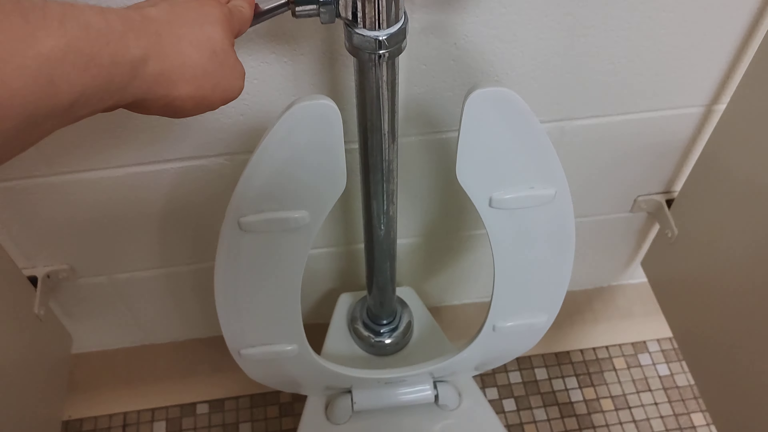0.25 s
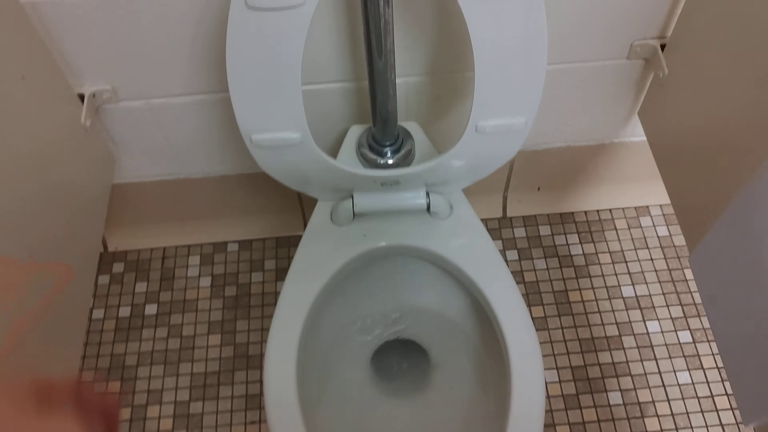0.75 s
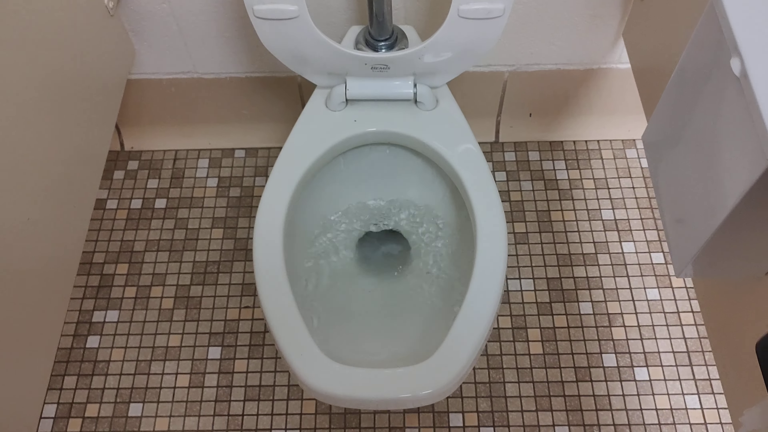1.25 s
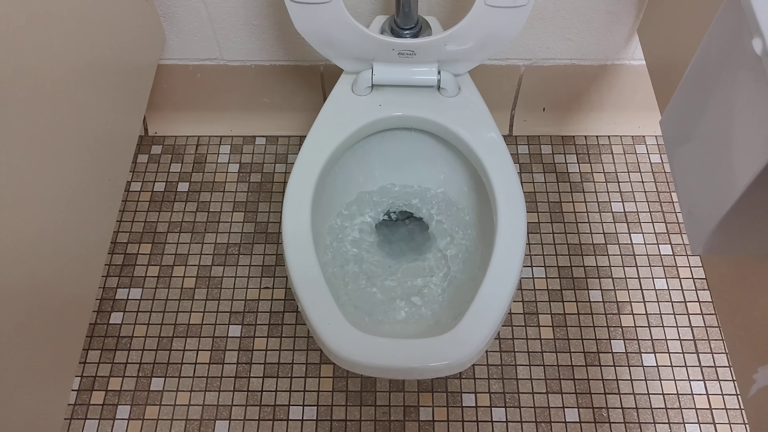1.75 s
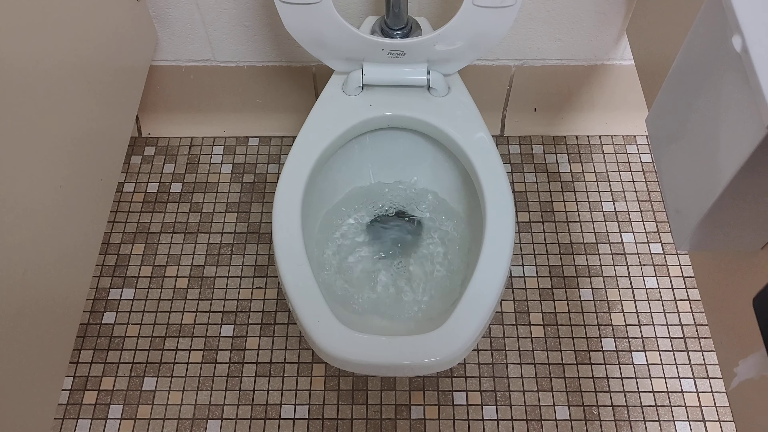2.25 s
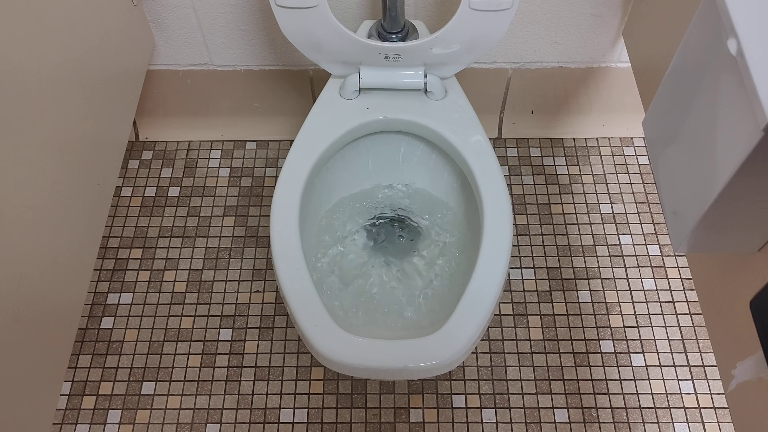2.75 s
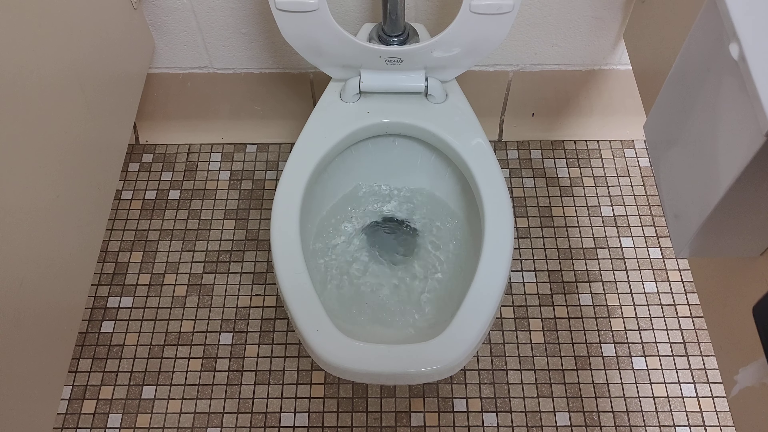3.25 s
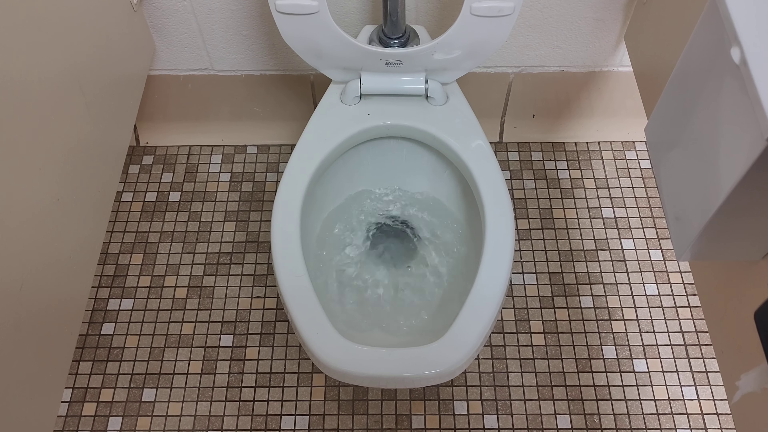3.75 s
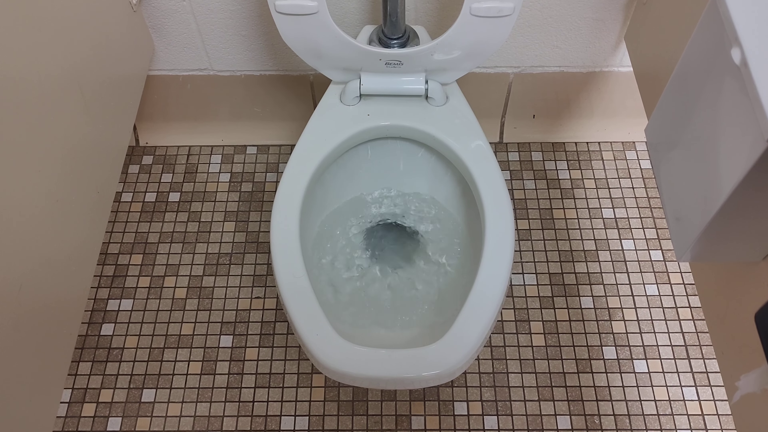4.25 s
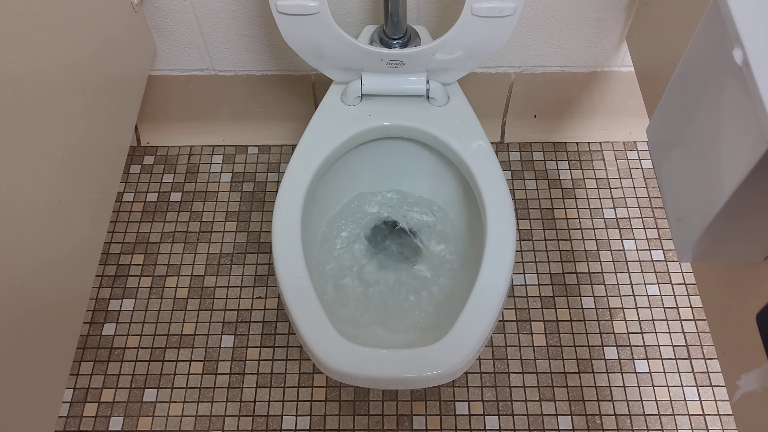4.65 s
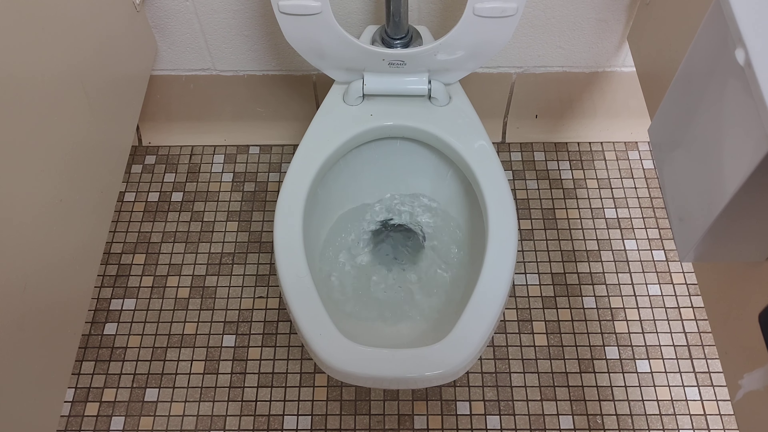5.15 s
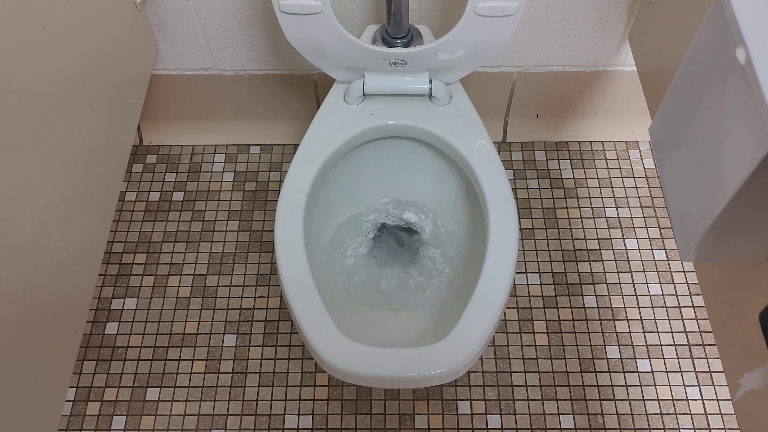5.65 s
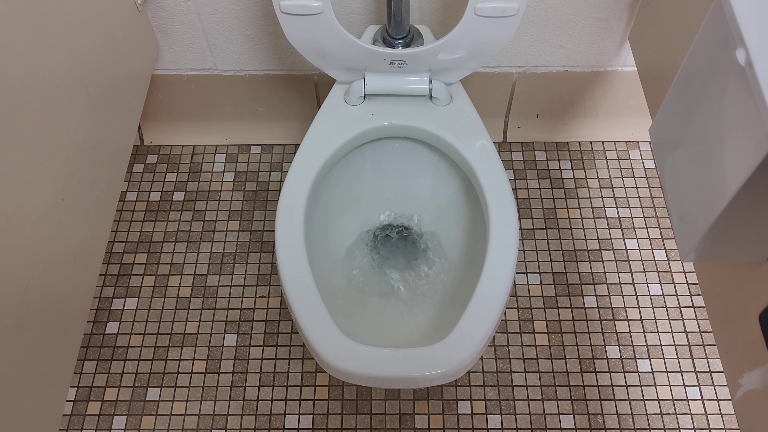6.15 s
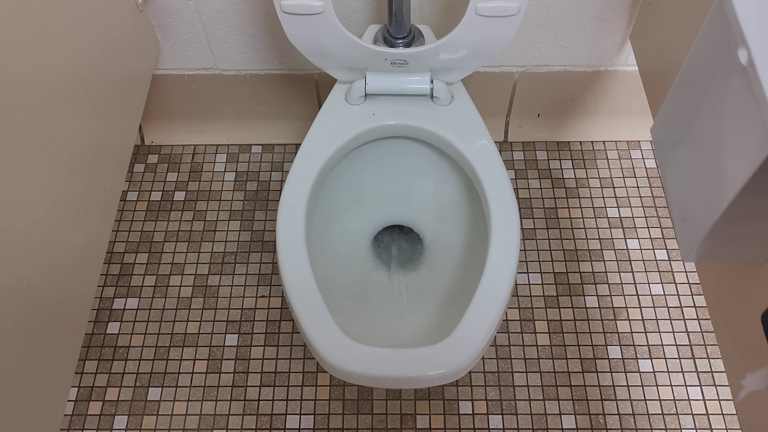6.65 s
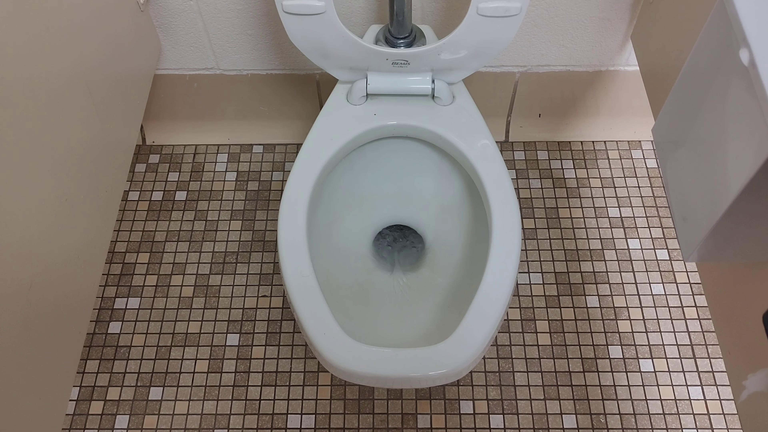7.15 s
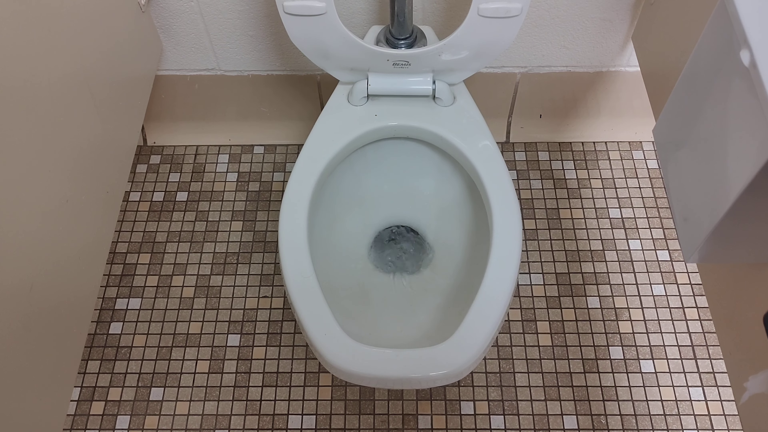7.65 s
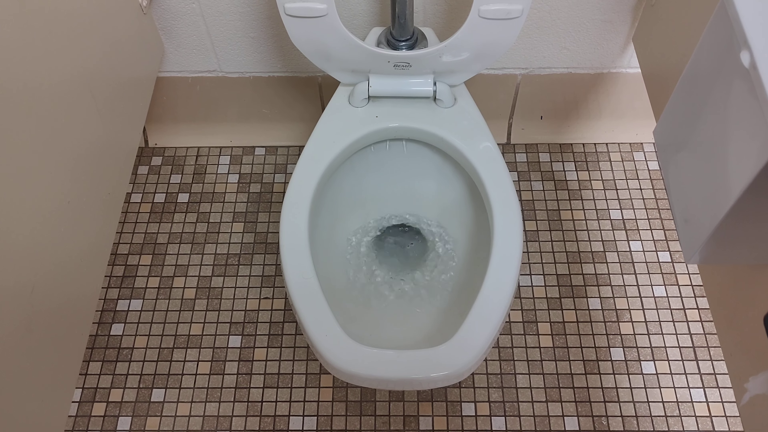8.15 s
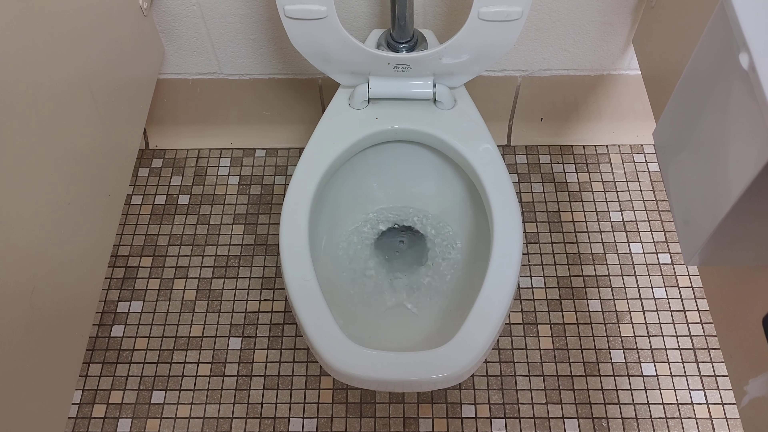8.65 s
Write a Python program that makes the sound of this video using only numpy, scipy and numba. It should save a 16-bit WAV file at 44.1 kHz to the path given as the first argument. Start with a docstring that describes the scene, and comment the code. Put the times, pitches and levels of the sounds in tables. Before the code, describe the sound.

In a small tiled restroom stall, a lever clicks twice and a pressure-valve toilet bursts into a spluttering, booming flush. It settles into a loud, steady, hissing rush of spray over a piped roar. The hiss sharpens as the valve closes with a short squeal, then the trap gulps and gurgles, drips fall, and the drain rumbles low. Close handheld stereo phone, about a metre away, faint ventilation.

```python
"""In a tiled public stall, a pressure-valve toilet flushes about a metre from a hand-held phone.
The handle clicks as two cracks of noise; air and water roar in the pipe as noise shaped by resonances.
Jets spray and splash round the bowl as slapping noise with fizzing bubbles; the closing valve squeals.
The trap gulps and drips fall as bursts of spray with ringing bubbles, while the drain rumbles away as
a wavering low hum. Ventilation noise runs throughout."""
import sys
import numpy as np
from scipy import signal
from scipy.fft import rfft, irfft, next_fast_len
from scipy.io import wavfile
from scipy.ndimage import uniform_filter1d, map_coordinates
from numba import njit

SR = 44100
rng = np.random.default_rng(int(sys.argv[2]) if len(sys.argv) > 2 else 0)


def to_wav(sig):
    """Store sig (one row per channel, or 1-D mono) as 16-bit WAV at the path in sys.argv[1].

    Samples outside -1..1 are clipped; the rate is SR.
    """
    pcm = np.clip(np.atleast_2d(sig), -1, 1) * 32767
    pcm = np.round(pcm).astype(np.int16)
    wavfile.write(sys.argv[1], SR, pcm.T)  # frames by channels


N = 392049
SIZE = next_fast_len(N + SR)
HZ = np.arange(SIZE // 2 + 1) * SR / SIZE + 1e-3  # frequency axis [Hz]
TIME = np.arange(N) / SR  # [s]

# Ventilation: (frequency [Hz], relative spectral density [dB per Hz])
VENTILATION = [(30, -31), (75, -6), (170, -2), (374, -18), (1430, -41), (8080, -36.5), (16000, -42.5)]
VENTILATION_DB = -56
# Handle cracks: (peak time [s], level before colouring [dB], time to fade 60 dB [s])
HANDLE_CRACKS = [(0.259, -38.5, 0.066), (0.305, -24, 0.19)]
# Supply pipe's faint singing: (time [s], level [dB])
PIPE_RING_LEVEL = [(.27, -71.5), (.32, -35), (.4, -41.5), (.46, -28.5), (.54, -28.5)]

# Water through the rim jets, a first spit, a spluttering start, full flow: (time [s], level [dB])
FLOW_LEVEL = [(.31, -22), (.39, -45.5), (.47, -28.5), (.62, -24), (.8, -25.5), (.96, -20.5), (1.1, -24),
              (1.3, -21.5), (1.52, -25), (2.7, -23), (5.9, -25), (6.7, -28.5), (7.25, -29)]
WATER_ARRIVES_S, PIPE_FILLED_S, DRAINING_S, BOWL_EMPTY_S = 0.424, 1.72, 5.12, 5.6
TRAP_OPENS_S, TRAP_RISE_DB_S = 6.79, 156.5
# At the end a fast fall, then a dwindling trickle
FLOW_ENDS_S, ENDING_DB_S, TRICKLE_DB, TRICKLE_DB_S = 7.343, 61.5, -16.5, 18.5

# Air jet at the rim holes: (frequency [Hz], width [Hz], level [dB]), before the sharpening in roar()
AIR_JET_MODES = [(10440, 7400, 0)]
AIR_JET_DB, AIR_GONE_S, AIR_FALL_DB_S = -15.5, 0.57, 30  # level relative to the flow

# Roar of the water-filled pipe: (time [s], level [dB])
PIPE_LEVEL = [(.31, -32.5), (1.15, -28.5), (1.52, -35), (1.8, -29), (2.7, -29), (5.9, -33.5), (6.74, -38.5)]
# Air resonances, lower and upper, of the full pipe and of the pipe still holding air:
# (frequency [Hz], width [Hz], level [dB]), before the sharpening in roar()
FULL_LOW_MODES = [(206, 82, -9.5), (306, 24, -5.5), (348.4, 39, 0)]
FULL_UPPER_MODES = [(499, 75, 0), (617.6, 51, 4), (764, 29, -7), (1012.5, 55, 0.5), (1348, 45, -2.5)]
AIRY_LOW_MODES = [(240.6, 6.4, -5.5), (313.4, 53, -4)]
AIRY_UPPER_MODES = [(613, 67, 2.5), (755, 97, 2), (999, 150, -3), (1334, 15, -4.5)]
UPPER_DB, UPPER_EMPTY_DB = -2, -13.5  # upper roar relative to the lower, after and before water arrives
TRAP_LOW_DB, TRAP_UPPER_DB = -29, -33  # roar of the open trap
# Air pockets bursting from the pipe, later through the trap:
# (time [s], low boom level [dB], upper boom level [dB])
BELCH_EVENTS = [(0.566, -6.5, -22.5), (0.609, -13, -22), (.665, -17.5, -17.5), (0.714, -19, -19),
                (0.776, -11, -17), (.84, -19, -17), (.9, -17.5, -16.5), (1.005, -25.5, -15.5),
                (1.05, -24, -18.5), (1.092, -21.5, -21), (1.165, -36, -24), (1.28, -46.5, -22.5),
                (1.36, -38, -17.5), (1.41, -43, -30), (6.81, -33, -51.5), (7.13, -21, -50.5),
                (7.22, -18, -42.5), (7.6, -33.5, -57.5), (8.075, -42.5, -58)]
BELCH_RISE_DB_S, BELCH_FALL_DB_S = 898.5, 166.5
# Steady roar of air under the bursts
GUSH_LOW_DB, GUSH_UPPER_DB, GUSH_S, GUSH_ENDS_S = -20.5, -26.5, 0.537, 0.99
# Trap resonances: (frequency [Hz], width [Hz], level [dB])
TRAP_MODES = [(1130, 81, 0.5), (1554, 87, -1), (3540, 2800, -6)]
SLURP_DB, SLURP_FALL_DB_S = -30, 13.5

# Stall and drain resonances: (frequency [Hz], width [Hz], level [dB]), before the sharpening in roar()
STALL_MODES = [(86.7, 6.3, 1), (120.7, 11, -3), (162.7, 21, -2)]
DRAIN_MODES = [(117, 39, -0.5), (197, 42, -7.5)]
SHAKE_DB, TRAP_SHAKE_DB = -36.5, -38.5
SURGE_DB, SURGE_S, SURGE_RISE_DB_S, SURGE_FALL_DB_S = -25.5, 0.57, 69, 17.5
DRAIN_HZ, DRAIN_DB, DRAIN_REST_DB = 86., -32.5, -56.5
DRAIN_S, DRAIN_HOLD_S, DRAIN_RISE_DB_S, DRAIN_FALL_DB_S = 8.05, 0.23, 81, 55.5

# Bowl resonances: (frequency [Hz], width [Hz], level [dB])
BOWL_MODES = [(1650, 70, 1), (1991, 31, 8.6), (2890, 23, 6.9), (3335, 570, 5), (5464, 130, 6.6),
              (8280, 880, 2.6)]
# Spray and hiss of the jets: (frequency [Hz], relative spectral density [dB per Hz])
SPRAY_SPECTRUM = [(900, -13), (1700, -5.5), (2440, -5.5), (3270, -2), (4600, -4.5), (6000, -25)]
HISS_SPECTRUM = [(3000, -20.5), (3900, -4.5), (5580, -0.5), (8170, -4.5), (8880, -6.5), (10700, -21.5),
                 (16500, -33.5)]
DRY_DB, DRIEST_S, WETTING_S = -13.5, 0.9, 0.62  # little spray while the jets blow air
RINGING_DB_S = 7.5  # bowl ringing's rise to full flow and fall after it
# The closing valve sharpens the hiss
SQUEEZE_DB, CLOSING_S, SHUT_S, EASES_S, EASING_DB_S = 9, 6.06, 6.49, 6.95, 25.5

# Splashes in the rush: (time [s], level before colouring [dB])
SPLASH_EVENTS = [(1.66, -10.5), (5.668, -10.5)]
# Plops in the rush, gulps of the trap, then drips: (time [s], relative level [dB],
# bubble frequency [Hz], extra level of the bubble [dB])
GULP_EVENTS = [(2.516, -12, 3770, 11.5), (3.015, -16, 4100, 4), (5.455, -12.5, 4220, 13.5),
               (6.789, -21, 1070, -1.5), (6.836, -10.5, 1180, 5), (6.925, -8.5, 1140, 2),
               (6.983, -12.5, 1060, 2), (7.119, -15, 1050, 0.5), (7.059, -4.5, 1570, -1.5),
               (7.202, 0, 1540, -0.5), (7.24, -12, 2190, 6.5), (7.298, -2, 1486, 4), (7.351, -12, 3980, 1),
               (7.387, -4.5, 1080, 1.5), (7.408, -15.5, 8360, 12), (7.4765, -8.5, 1607, 6.5),
               (7.603, -16, 1770, -13.5), (7.62, -14, 8400, 6.5), (7.713, -25.5, 2120, 11.5),
               (7.91, -25, 3350, 0), (7.999, -30, 9000, 4), (8.154, -25.5, 4170, 3.5),
               (8.226, -34, 8880, 2), (8.343, -33.5, 8640, 4.5), (8.43, -34.5, 8880, -2),
               (8.7013, -49, 3060, 11), (8.779, -28, 8400, 6.5)]
DRIP_RING_S, DRIP_CYCLES = 0.003, 22  # late bubbles' ringing and its upper limit in cycles

# Narrow jet at the valve seat: (frequency [Hz], width [Hz], level [dB]), before the sharpening in roar()
SIZZLE_MODES = [(5600, 920, -0.5), (13300, 2500, -17.5)]
SIZZLE_DB = -26
# Valve squeal: (frequency [Hz], width [Hz], start of full level [s], end of full level [s], level [dB])
SQUEAL_BANDS = [(3175, 110, 6.68, 6.78, -24), (3500, 220, 6.7, 6.86, -26)]
SQUEAL_RISE_DB_S, SQUEAL_FALL_DB_S = 90, 160

# Echo decay constant of the bowl, then level and 60 dB decay time of the tiles
BOWL_ECHO_S, TILES_DB, TILES_T60_S = 0.0044, -21, 0.3
DIRECT_DB = 13.5  # straight path over the first echoes
WALL_SHARE, WALL_HZ, WALL_S = 0.71, 4060, .014  # share of power, its corner, decay constant
# The phone shades its left port: (frequency [Hz], left minus right [dB])
PORT_SHADING = [(150, 0), (450, 2), (1200, -1), (2400, -5.5), (4400, -8), (8000, -10), (15000, -6)]
# Sound that differs between the ports: (frequency [Hz], share of power [0 to 1])
DIFFUSE_SHARE = [(100, .002), (250, 0.041), (500, 0.38), (1000, 1), (3000, 1), (8000, 1)]
LEFT_LAG_S, BASS_HZ, TOP_HZ = 4e-5, 64, 16150


def undb(db):
    """Decibel law: amplitude gain of a level in dB."""
    return 10 ** (np.asarray(db) / 20)


def unit(x):
    """Power normalisation: the signal scaled to rms 1."""
    return x / np.sqrt(np.mean(x ** 2))


def over_hz(table):
    """Spectral interpolation: a (frequency, value) table along log frequency."""
    hz, value = np.transpose(table)
    return np.interp(np.log(HZ), np.log(hz), value)


def over_time(table):
    """Envelope interpolation: a level curve in dB, practically silent before its first point."""
    s, db = np.transpose(table)
    return np.interp(TIME, s, db, left=-120)


def hump(start, end, rise_db_s, fall_db_s):
    """Exponential growth and decay: level in dB that rises to 0 at start, holds, and falls after end."""
    return np.minimum(0, np.minimum(rise_db_s * (TIME - start), fall_db_s * (end - TIME)))


def together(*levels_db):
    """Incoherent superposition: gain of unrelated sounds added in power."""
    return np.sqrt(sum(undb(db) ** 2 for db in levels_db))


def resonances(table):
    """Lorentzian resonance: summed power response of a set of modes."""
    return sum(undb(2 * db) / (1 + (2 * (HZ - hz) / width) ** 2) for hz, width, db in table)


def colour(x, gain):
    """Linear filtering: the spectrum multiplied by a response."""
    return irfft(rfft(x, SIZE) * gain, SIZE)[..., :N]


def walk(rate):
    """Slow random fluctuation: levels held 1 / rate s and smoothed twice; rms 1."""
    k = int(SR / rate)
    steps = np.repeat(rng.standard_normal(N // k + 1), k)
    return unit(uniform_filter1d(uniform_filter1d(steps, k), k)[:N])


def noise():
    """Mutual incoherence: one noise heard alike at both ports, and one reaching each port alone."""
    return rng.standard_normal((3, N))


def roar(modes, flicker_db, rate):
    """Resonance driven by turbulence: unsteady noise through a set of modes; rms 1."""
    turbulence = noise() * undb(flicker_db * walk(rate))
    return unit(colour(turbulence, resonances(modes) ** 0.71))  # 0.5 would be the plain response


def wander(x, depth, rate):
    """Shifting resonance: an unrelated stretch of the sound, its pitch drifting as water reshapes the space."""
    place = np.arange(N) + SR // 2 + np.cumsum(depth * walk(rate))
    return np.array([map_coordinates(row, [place], mode="mirror") for row in x])


@njit
def bubbles(n, start, turn, cycles, size, glide):
    """Damped bubble oscillation: each rings a few cycles while its pitch rises."""
    out = np.zeros(n)
    for k in range(len(start)):
        z = size[k] + 0j
        w = turn[k]  # radians per sample
        fade = np.exp(-turn[k] / (2 * np.pi * cycles[k]))
        for i in range(start[k], min(n, start[k] + int(40 * cycles[k] / w))):
            out[i] += z.imag
            z *= fade * np.exp(1j * w)
            w = min(w * (1 + glide * w / cycles[k]), 3.)
    return out


def surges(count, scatter_db, fade_s):
    """Random impacts with exponential decay: slaps of water, a few of them large; rms 1."""
    slaps = np.zeros(N)
    when, rarity = rng.random((count, 2)).T
    slaps[(when * N).astype(int)] = undb(-scatter_db * np.log(1 - rarity * (1 - 1 / 20)))
    return unit(signal.lfilter([1], [1, -np.exp(-1 / (fade_s * SR))], slaps))


def fizz(count, low_hz, high_hz, cycles, scatter_db):
    """Superposed bubble oscillations: a dense cloud of small bubbles of many sizes; rms 1."""
    when, pitch, big = rng.random((count, 3)).T
    turn = 2 * np.pi * low_hz * (high_hz / low_hz) ** pitch / SR
    size = undb(-scatter_db * np.log(1 - big * (1 - 1 / 120)))
    return unit(bubbles(N, (when * N).astype(np.int64), turn, np.full(count, cycles), size, 0.0072))


def bursts(s, db, length, rise_s):
    """Transient turbulence: broad noise swells up to each moment and fades 60 dB in each length."""
    envelope = np.zeros(N)
    for peak, top, t60 in zip(s, undb(db), length):
        span = slice(int((peak - 4 * rise_s) * SR), int((peak + t60) * SR))
        after = TIME[span] - peak
        envelope[span] += top * np.exp(np.minimum(after / rise_s, -np.log(1000) * after / t60))
    return envelope * rng.standard_normal(N)


def plops(s, db, hz, cycles):
    """Single bubble oscillation: one bubble for each event."""
    return bubbles(N, (s * SR).astype(np.int64), 2 * np.pi * hz / SR, cycles, undb(db), 0.0015)


def ebb():
    """Decay of the driving flow: gain 1 while it runs, then dying away unevenly."""
    ending_db = hump(0, FLOW_ENDS_S, 1, ENDING_DB_S)
    trickle_db = TRICKLE_DB + 3.0 * walk(14) + hump(0, FLOW_ENDS_S, 1, TRICKLE_DB_S)
    return np.minimum(1, together(ending_db, trickle_db))


def ventilation():
    """Stationary broadband noise: the ventilation's steady spectrum."""
    return unit(colour(noise(), undb(over_hz(VENTILATION)))) * undb(VENTILATION_DB)


def handle():
    """Impact excitation: the lever's slack taken up, then the blow on the valve, as cracks of noise."""
    s, db, length = np.transpose(HANDLE_CRACKS)
    body_db = over_hz([(200, -24), (900, 5.0), (1700, -10.5), (3000, 12), (9000, -8.5), (16000, -37)])
    return colour(bursts(s, db, length, .0004), undb(body_db))


def pipe_ring():
    """Narrow resonance: the supply pipe sings faintly from the touch on the lever until water arrives."""
    ring = roar([(1011, 36, 0)], flicker_db=5.0, rate=30.9) * undb(over_time(PIPE_RING_LEVEL))
    return ring * (TIME < PIPE_RING_LEVEL[-1][0])


def air_jet():
    """Jet turbulence: air pushed ahead of the water hisses brightly from the rim holes."""
    level_db = over_time(FLOW_LEVEL) + AIR_JET_DB + hump(0, AIR_GONE_S, 1, AIR_FALL_DB_S)
    return roar(AIR_JET_MODES, flicker_db=5.5, rate=14.1) * undb(level_db)


def full_pipe():
    """Pipe resonance: turbulent water roars evenly, and the open trap adds to it."""
    pipe_db = over_time(PIPE_LEVEL)
    trap_db = hump(TRAP_OPENS_S, 10, TRAP_RISE_DB_S, 1)
    upper_db = pipe_db + np.where(TIME < WATER_ARRIVES_S, UPPER_EMPTY_DB, UPPER_DB)
    low = roar(FULL_LOW_MODES, flicker_db=1.63, rate=33) * together(pipe_db, TRAP_LOW_DB + trap_db)
    upper = roar(FULL_UPPER_MODES, flicker_db=2.0, rate=40) * together(upper_db, TRAP_UPPER_DB + trap_db)
    return low + upper


def belches():
    """Air-column resonance: trapped air booms in bursts over a steady gush."""
    shapes = [hump(s, s, BELCH_RISE_DB_S, BELCH_FALL_DB_S) for s, *_ in BELCH_EVENTS]
    gush_db = hump(GUSH_S, GUSH_ENDS_S, BELCH_RISE_DB_S, BELCH_FALL_DB_S)
    low_levels = [shape + low_db for shape, (_, low_db, _) in zip(shapes, BELCH_EVENTS)]
    upper_levels = [shape + up_db for shape, (_, _, up_db) in zip(shapes, BELCH_EVENTS)]
    low = roar(AIRY_LOW_MODES, flicker_db=2.0, rate=45)
    upper = wander(roar(AIRY_UPPER_MODES, flicker_db=2.0, rate=50), depth=.02, rate=8)
    return (low * together(GUSH_LOW_DB + gush_db, *low_levels)
            + upper * together(GUSH_UPPER_DB + gush_db, *upper_levels))


def trap_slurp():
    """Two-phase flow: the trap gurgles with slaps and bubbles when it sucks air."""
    slaps = .2 + surges(count=600, scatter_db=1.5, fade_s=.007)
    cloud = fizz(count=2200, low_hz=602, high_hz=2310, cycles=4.6, scatter_db=2.5)
    slurp = noise() * slaps + 0.59 * cloud
    level_db = SLURP_DB + hump(TRAP_OPENS_S, FLOW_ENDS_S, TRAP_RISE_DB_S, SLURP_FALL_DB_S)
    return unit(colour(slurp, np.sqrt(resonances(TRAP_MODES)))) * undb(level_db)


def pipe():
    """Superposition in the pipe: roar and gurgle die with the flow; belches fade on their own."""
    return belches() + (full_pipe() + trap_slurp()) * ebb()


def stall_shake():
    """Room modes: the rush shakes the stall's air."""
    shake = together(SHAKE_DB + hump(SURGE_S, 10, SURGE_RISE_DB_S, 1),
                     SURGE_DB + hump(SURGE_S, SURGE_S, SURGE_RISE_DB_S, SURGE_FALL_DB_S),
                     TRAP_SHAKE_DB + hump(TRAP_OPENS_S, 10, TRAP_RISE_DB_S, 1))
    return roar(STALL_MODES, flicker_db=1.5, rate=6) * shake * (TIME > FLOW_LEVEL[0][0]) * ebb()


def jet_levels():
    """Source strength: spray and hiss [dB] follow the flow; spray waits for a wet bowl, hiss peaks at closing."""
    flow_db = over_time(FLOW_LEVEL)
    drying = np.clip((TIME - WATER_ARRIVES_S) / (DRIEST_S - WATER_ARRIVES_S), 0, 1)
    dry_bowl = drying * np.exp(-np.maximum(TIME - DRIEST_S, 0) / WETTING_S)
    squeeze_db = SQUEEZE_DB + hump(SHUT_S, EASES_S, SQUEEZE_DB / (SHUT_S - CLOSING_S), EASING_DB_S)
    spray_db = flow_db + DRY_DB * dry_bowl + hump(WATER_ARRIVES_S, 10, 500., 1)
    return spray_db, flow_db + np.maximum(squeeze_db, 0)


def in_bowl(x, spectrum):
    """Cavity resonance: coloured noise plus bowl ringing that drifts, flickers and is strongest at full flow."""
    gain = undb(over_hz(spectrum))
    ringing = wander(colour(x, gain * np.sqrt(resonances(BOWL_MODES))), depth=.0045, rate=8)
    ringing_db = 1.84 * walk(24.125) + hump(PIPE_FILLED_S, DRAINING_S, RINGING_DB_S, RINGING_DB_S)
    return unit(colour(x, gain) + ringing * undb(ringing_db))


def jets():
    """Jet impact: noise in slaps shared by spray and hiss, with fizzing bubbles, coloured by the bowl."""
    spray_db, hiss_db = jet_levels()
    slaps = 2.0 + surges(count=1200, scatter_db=7.0, fade_s=0.0028)
    coarse_fizz = fizz(count=12000, low_hz=1866, high_hz=4485, cycles=9.5, scatter_db=3.5)
    fine_fizz = fizz(count=14000, low_hz=3986, high_hz=13300, cycles=10.0, scatter_db=5.0)
    spray = noise() * slaps * undb(2.28 * walk(11)) + 0.68 * coarse_fizz
    hiss = noise() * slaps * undb(0.88 * walk(25)) + 0.36 * fine_fizz
    # until the rim jets run full, air hisses through them in a narrower band
    airy = 0.62 * np.clip((TIME - .6) / 0.35, 0, 1) * np.clip((PIPE_FILLED_S - TIME) / 0.32 + 1, 0, 1)
    rim_response = resonances([(4430, 430, 1.9), (5090, 330, 3.5), (6120, 1500, 0.44)]) ** 0.63
    narrow = wander(unit(colour(hiss, rim_response)), depth=0.021, rate=12)
    mixed_hiss = np.sqrt(airy) * narrow + np.sqrt(1 - airy) * in_bowl(hiss, HISS_SPECTRUM)
    return (in_bowl(spray, SPRAY_SPECTRUM) * undb(spray_db) + mixed_hiss * undb(hiss_db)) * ebb()


def water_hits():
    """Impact and bubble entrainment: splashes, gulps and drips as knots of bubbles over bursts of spray."""
    s, db = np.transpose(SPLASH_EVENTS)
    g_s, g_db, g_hz, ring_db = np.transpose(GULP_EVENTS)
    porcelain = undb(over_hz([(300, -33.0), (1000, 9.0), (4000, 3.5), (8600, 5.0), (11000, -8.5), (16000, -24)]))
    length = .06 + .06 * undb(g_db)  # larger gulps last longer
    fine = g_hz > 4000
    coarse = bursts(g_s[~fine], g_db[~fine] - 14.5, length[~fine], 0.00074)

    # small drops and splashes tick without body
    ticks = bursts(s, db, np.full(len(s), .03), 0.0014)
    ticks = ticks + bursts(g_s[fine], g_db[fine] - 12.0, length[fine], .0005)
    when, size = rng.random((45, 2)).T  # droplets running off the rim
    droplet_db = -41 - 12 * size - 17 * when
    ticks = ticks + bursts(FLOW_ENDS_S + 1.5 * when, droplet_db, np.full(len(when), .045), .0015)
    bodiless = porcelain / np.sqrt(1 + (5000 / HZ) ** 6)

    late_cycles = np.minimum(DRIP_RING_S * g_hz, DRIP_CYCLES)
    cycles = np.where(g_s > BOWL_EMPTY_S, late_cycles, np.minimum(0.0015 * g_hz, 6.))
    rings = plops(g_s, g_db - 5.5 + ring_db, g_hz, cycles)

    # smaller bubbles break off around the main one
    late, off, weak = rng.random((len(g_s), 3, 12)).transpose(1, 0, 2)
    knot_s = g_s[:, None] + length[:, None] * .5 * (late - .3)
    knot_db = g_db[:, None] - 10.5 - 8 * weak
    pitch_range = np.where(fine, 1.8, 4.5)[:, None]
    knot_hz = g_hz[:, None] * pitch_range ** (off - np.where(fine, .5, .2)[:, None])
    knot = plops(knot_s.ravel(), knot_db.ravel(), knot_hz.ravel(), np.full(late.size, 3.))
    return colour(coarse, porcelain) + colour(ticks, bodiless) + rings + knot


def sizzle():
    """Constricted-flow turbulence: water forced past the closing valve seat sizzles in two high bands."""
    level_db = SIZZLE_DB + hump(SHUT_S - .25, EASES_S, 25., 45.)
    return roar(SIZZLE_MODES, flicker_db=3.0, rate=7) * undb(level_db)


def whistle():
    """Narrow-band noise: the closing valve squeals in two ragged bands; the upper one lasts longer."""
    squeal = np.zeros(N)
    for hz, width, start, end, db in SQUEAL_BANDS:
        band = unit(colour(rng.standard_normal(N), resonances([(hz, width, 0)])))
        squeal += band * undb(db + hump(start, end, SQUEAL_RISE_DB_S, SQUEAL_FALL_DB_S))
    return squeal


def drain():
    """Low pipe resonance: the drain hums on its lowest note, wavering in pitch and strength."""
    phase = 2 * np.pi * np.cumsum(DRAIN_HZ * (1 + 0.038 * walk(25))) / SR
    hum = np.sqrt(2) * np.sin(phase) * undb(1.3 * walk(15))
    rumble = 0.8 * hum + 0.55 * roar(DRAIN_MODES, flicker_db=0.0, rate=12)
    swell_db = DRAIN_DB + hump(DRAIN_S, DRAIN_S + DRAIN_HOLD_S, DRAIN_RISE_DB_S, DRAIN_FALL_DB_S)
    return rumble * together(swell_db, DRAIN_REST_DB + hump(DRAIN_S, 10, DRAIN_RISE_DB_S, 1))


def wall(sound):
    """Reflection: part of the spread sound at the left port reaches the right one too, by way of a wall."""
    path = rfft(rng.standard_normal(SR // 10) * np.exp(-TIME[:SR // 10] / WALL_S), SIZE)
    both = WALL_SHARE / (1 + (HZ / WALL_HZ) ** 2)
    power = np.abs(path) ** 2
    path = path * np.sqrt(both / (power + np.mean(power) / 10))
    right = colour(sound[2], np.sqrt(1 - np.abs(path) ** 2)) + colour(sound[1], path)
    return np.array([sound[0], sound[1], right])


def echoes(x):
    """Reverberation: direct sound, then quick echoes off the bowl and fainter ones off the tiles."""
    after = TIME[:SR // 2]
    tiles = undb(TILES_DB) * np.exp(-np.log(1000) * after / TILES_T60_S)
    tail = rng.standard_normal((2, len(after))) * (np.exp(-after / BOWL_ECHO_S) + tiles)
    tail[:, 0] = undb(DIRECT_DB)
    tail /= np.sqrt(np.sum(tail ** 2, axis=1, keepdims=True))
    return np.vstack([x, colour(x, rfft(tail, SIZE))])


def phone_ports(sound):
    """Spatial coherence: bass is alike at both ports; treble comes from all round and differs."""
    share = over_hz(DIFFUSE_SHARE)
    side = np.array([[1], [-1]])  # left, right
    lag = np.exp(-1j * np.pi * HZ * LEFT_LAG_S * side)
    ports = undb(side * over_hz(PORT_SHADING) / 2) * lag
    # even out the power of the two ports' mean
    alike_power = (1 - share) * np.abs(ports.mean(axis=0)) ** 2
    ports /= np.sqrt(alike_power + share * np.mean(np.abs(ports) ** 2, axis=0) / 2)
    return colour(sound[0], ports * np.sqrt(1 - share)) + colour(sound[1:], ports * np.sqrt(share))


def scene():
    """Superposition: spread sources by way of the wall, small sources with their echoes, at two ports."""
    spread = ventilation() + pipe_ring() + air_jet() + pipe() + stall_shake() + jets() + sizzle() + drain()
    small = handle() + water_hits() + whistle()
    return phone_ports(wall(spread) + echoes(small))


def record(dry):
    """Band limiting and saturation: the phone drops deep bass, rounds the loudest peaks and cuts the top."""
    dry = signal.sosfilt(signal.butter(3, BASS_HZ, "high", fs=SR, output="sos"), dry)
    rounded = np.tanh(.6 * dry) / .6
    return signal.sosfilt(signal.ellip(14, .2, 95, TOP_HZ, fs=SR, output="sos"), rounded)


dry = scene()
out = record(dry)
to_wav(out)
```